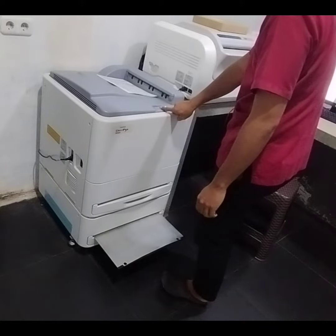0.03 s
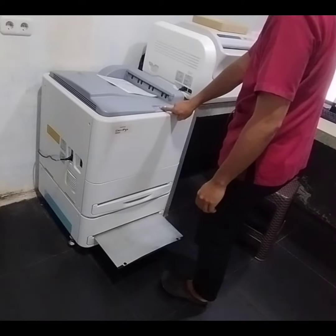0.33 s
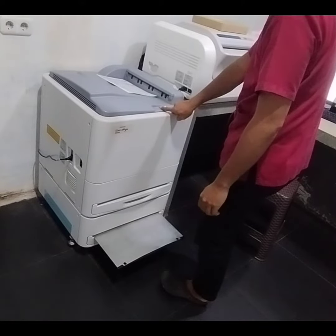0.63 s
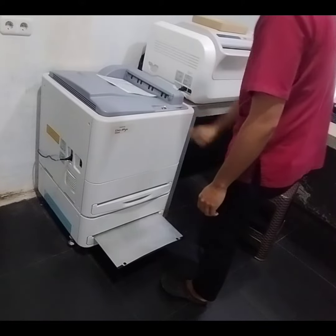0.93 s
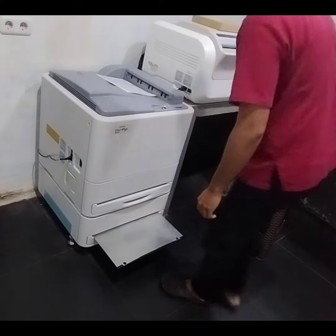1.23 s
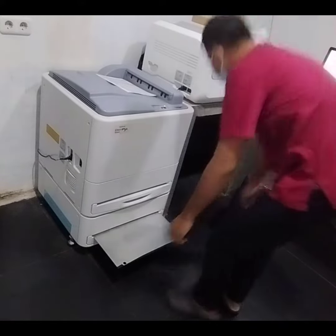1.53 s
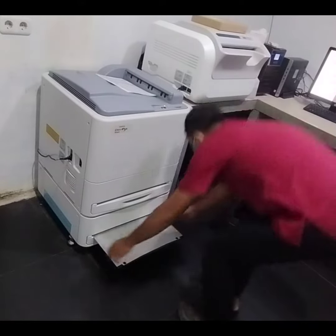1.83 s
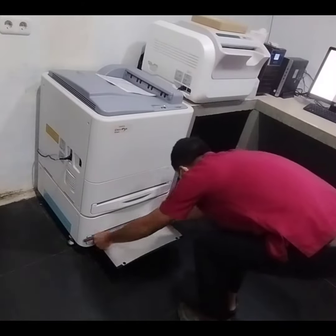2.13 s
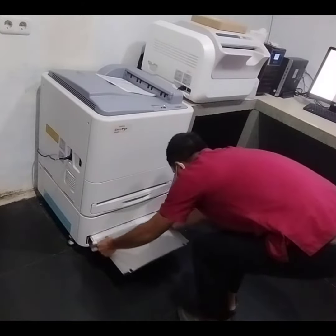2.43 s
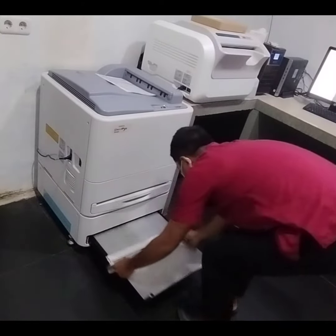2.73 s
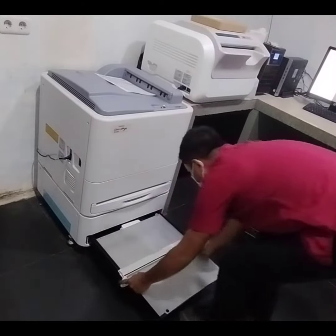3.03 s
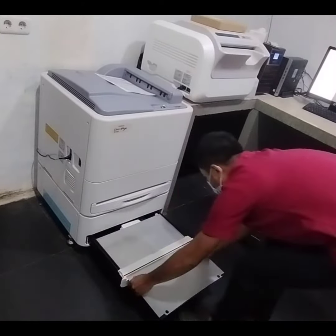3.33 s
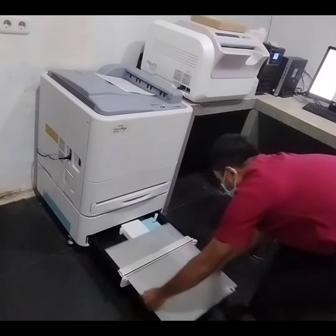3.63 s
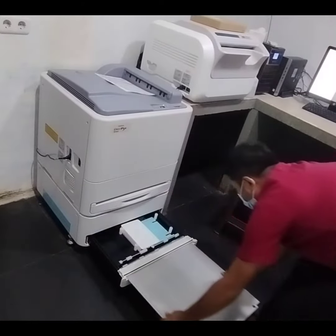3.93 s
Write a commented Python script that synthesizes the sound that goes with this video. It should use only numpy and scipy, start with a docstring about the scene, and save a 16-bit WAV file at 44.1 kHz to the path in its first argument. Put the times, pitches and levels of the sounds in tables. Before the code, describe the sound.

A plastic machine tray clacks open and rattles along its rails in a small room.

```python
"""Opening a film printer's tray.

A film printer's fans hum in a small tiled room. A button on its lid clacks; someone bends down with
rustling clothes, twists a creaky latch and draws out the plastic film tray. It knocks, clinks and
rattles along its steel rails, then scrapes with a low stick-slip groan. A phone hears it all from
two metres, mostly by way of the walls."""
import sys
import numpy as np
from scipy import signal
from scipy.fft import rfft, irfft
from scipy.io import wavfile

SR = 44100
rng = np.random.default_rng(int(sys.argv[2]) if len(sys.argv) > 2 else 0)


def file_out(sig):
    """Save sig as 16-bit WAV at sys.argv[1]."""
    # one column per channel
    cols = np.atleast_2d(sig).T
    # limit, then scale
    lim = np.clip(cols, -1, 1)
    pcm = np.round(lim * 32767).astype(np.int16)
    wavfile.write(sys.argv[1], SR, pcm)


N = 176400
T = np.arange(N) / SR
HZ = np.arange(N + 1) * SR / (2 * N)


def amp(db):
    return 10 ** (np.asarray(db) / 20)


def unit_rms(x):
    return x / np.sqrt(np.mean(x ** 2))


def unit_energy(x):
    return unit_rms(x) / np.sqrt(N)


def curve(rows, column=1):
    """One column of a table, joined over time."""
    rows = np.array(rows)
    return np.interp(T, rows[:, 0], rows[:, column])


def per_hz(points, hz):
    """Points joined on a log-frequency axis."""
    points = np.array(points)
    return np.interp(np.log(hz + 1), np.log(points[:, 0]), points[:, 1])


def response(colour):
    """Minimum-phase impulse response of an EQ curve."""
    cepstrum = irfft(np.log(amp(per_hz(colour, HZ))))
    cepstrum[1:N] *= 2
    cepstrum[N + 1:] = 0
    return unit_energy(irfft(np.exp(rfft(cepstrum)))[:N])


def convolve(x, h):
    return irfft(rfft(x, 2 * N) * rfft(h, 2 * N))[..., :N]


def drift(rate_hz):
    """Smooth random motion with a spread of 1."""
    return unit_rms(irfft(rfft(rng.standard_normal(2 * N)) / (1 + (HZ / rate_hz) ** 4))[:N])


def diffuse(alike_hz=556):
    """Stereo spectrum of noise from all sides: left and right agree only in the bass."""
    alike = 1 / (1 + (HZ / alike_hz) ** 2)
    mid, side = rfft(rng.standard_normal((2, 2 * N)))
    return mid * np.sqrt(1 + alike) + np.array([[1], [-1]]) * side * np.sqrt(1 - alike)


def grains(per_s, spread_db):
    """Dense tiny clicks of very unequal size."""
    size = amp(spread_db * np.minimum(rng.exponential(size=N), 4))
    return unit_rms((rng.random(N) < per_s / SR) * size * rng.standard_normal(N))


def mode(hz, t60, age=T):
    """One resonance ringing out."""
    return np.sin(2 * np.pi * hz * age) * np.exp(-np.log(1000) * age / t60)


# reverb time of the tiled room (frequency [Hz], t60 [s])
ROOM_DECAY = [(100, 0.77), (400, 0.75), (3000, 0.78), (8000, 0.77), (14000, 0.37)]


def room(build_s=0.00067):
    """Stereo tail of the hard walls, shorter in the top octave."""
    noise, tail = diffuse(), 0
    edges = np.r_[0, np.geomspace(150, SR / 2, 10)]
    for lo, hi in zip(edges, edges[1:]):
        band = irfft(noise * (HZ >= lo) * (HZ < hi))[:, :N]
        tail = tail + band * np.exp(-np.log(1000) * T / per_hz(ROOM_DECAY, (lo + hi) / 2))
    return unit_energy(tail * (1 - np.exp(-T / build_s)))


def in_room(x, walls, direct_db=-8):
    """Reverb with the weaker direct sound mixed in."""
    return convolve(x, walls) + amp(direct_db) * x


def plastic_shell(colour, modes, ring_db):
    """Response of struck plastic: a broad crack and a few ringing modes."""
    ring = sum(amp(db) * mode(hz, t60) for hz, db, t60 in modes)
    return unit_energy(response(colour) + amp(ring_db) * unit_energy(ring))


def whiten(push):
    """Keep a hit's timing but spread its energy evenly over all frequencies."""
    spectrum = rfft(push, 4 * len(push))
    flat = irfft(spectrum / abs(spectrum))[:len(push)]
    return flat / np.linalg.norm(flat)


def blows(hits, shell, thud_hz=742, tick_hz=6440):
    """Each hit is a push and a brief chatter in three bands; hits alternate between two room tails."""
    # (edges [Hz], filter, chatter decay [s], chatter over push [dB], direct sound [dB])
    bands = [(thud_hz, "low", 0.014, 10.5, -4.5),
             ([thud_hz, tick_hz], "band", 0.0061, 10.5, -8),
             (tick_hz, "high", 0.0061, 41, -5.5)]
    spots, out = [room(), room()], 0
    noise = rng.standard_normal((len(hits), SR // 4))
    t = T[:noise.shape[1]]
    for k, (edges, kind, chatter_s, chatter_db, direct_db) in enumerate(bands):
        force = np.zeros((2, N))
        for i, (at, *band_db) in enumerate(hits):
            chatter = noise[i] * np.exp(-t / chatter_s)
            push = (t == 0) + amp(chatter_db) * chatter / np.linalg.norm(chatter)
            start = int(at * SR)
            force[i % 2, start:start + len(t)] += amp(band_db[k]) * whiten(push)
        crossover = signal.butter(4, edges, kind, fs=SR, output="sos")
        struck = convolve(force, unit_energy(signal.sosfilt(crossover, shell)))
        out = out + sum(in_room(x, walls, direct_db) for x, walls in zip(struck, spots))
    return out


# dark wash of fan air (frequency [Hz], gain [dB])
AIR_COLOUR = [(20, -5.5), (45, -20), (86, -7), (144, -5.5), (267, -15), (399, -11), (780, -21),
              (1400, -29.5), (5000, -40), (8000, -52), (15500, -57.5)]
# motor hum (frequency [Hz], level [dB])
MOTOR_TONES = [(48.4, -53), (100.5, -48.5), (147, -50), (296, -58), (786, -59), (812.9, -61), (1087, -62),
               (2094, -70), (3262, -68), (5010, -76)]


def fans():
    """The bed: cooling fans push steady air over slightly wavering motor tones."""
    air = unit_rms(convolve(irfft(diffuse())[:, :N], response(AIR_COLOUR)))
    air *= amp(-41.5 + .5 * drift(13))
    hum = sum(amp(db + 1.5 * drift(5.6)) * np.sin(2 * np.pi * hz * T + 0.8 * drift(3.5))
              for hz, db in MOTOR_TONES)
    return air + hum


# button press and release (time [s], thud [dB], clack [dB], tick [dB])
BUTTON_HITS = [(.398, -11, -12, -23), (.4036, -5.5, -1.5, -8), (.4111, 3.5, -16.5, -33),
               (.8451, -15, -17, -19)]
# crack of the lid (frequency [Hz], gain [dB])
LID_COLOUR = [(45, -27), (129, -4.5), (266, -3), (413, 1), (740, -12), (1350, -9.5), (3270, -14.5),
              (8470, -38), (15500, -27.5)]
# ring of the lid (frequency [Hz], gain [dB], t60 [s])
LID_RING = [(250, 4, 0.25), (385, 6, 0.2), (953, -10, .6), (1303, -1, 0.33), (1707, -11, .6),
            (2245, -8, .55), (2600, -2, 0.27), (3290, -6, .65)]


def button():
    """The button strikes the plastic lid: a firm clack down, a softer one back up."""
    return blows(BUTTON_HITS, plastic_shell(LID_COLOUR, LID_RING, ring_db=-6))


# swishes of clothing (time [s], half width [s], level [dB])
SWISHES = [(.815, 0.041, -51.5), (1.36, 0.065, -48.5), (1.61, 0.11, -54), (1.711, 0.056, -47.5),
           (2.1, 0.28, -53), (3.075, 0.053, -40)]
# airy tone of the fabric (frequency [Hz], gain [dB])
CLOTH_COLOUR = [(300, -28), (1200, 1.5), (3500, -2.5), (6000, -3), (8500, -9.5), (11000, -7), (13000, -5.5),
                (15500, 0)]


def clothes(walls):
    """Fabric rubs in soft, grainy swells as the person turns and crouches."""
    swell = sum(amp(db) * np.exp(-((T - at) / width) ** 2) for at, width, db in SWISHES)
    friction = swell * grains(per_s=9000, spread_db=4)
    return in_room(convolve(friction, response(CLOTH_COLOUR)), walls)


# rattle of the tray running on its rails (time [s], level [dB])
RATTLE_LEVEL = [(2.2, -42.5), (2.33, -43.5), (2.49, -35.5), (2.62, -43.5), (2.78, -37), (2.88, -40.5),
                (2.96, -28.5), (3.05, -45), (3.22, -40.5), (3.4, -53.5)]


def rattle(tray, walls):
    """The rails shake the tray with small, uneven clicks."""
    force = grains(per_s=2000, spread_db=2.5) * amp(curve(RATTLE_LEVEL) + 1.6 * drift(29))
    moving = T > RATTLE_LEVEL[0][0]
    return in_room(convolve(force * moving, tray), walls)


# fingers twisting the latch (time [s], level [dB])
CREAK_LEVEL = [(2.25, -43), (2.28, -49), (2.32, -48), (2.345, -41), (2.46, -47)]
# squeaky resonances of the latch (frequency [Hz], width [Hz], gain [dB])
LATCH_PEAKS = [(1100, 210, 2.5), (1640, 750, 4), (3080, 1000, -6), (5140, 4200, -13)]


def latch_creak(walls):
    """The plastic latch rubs in its seat: quick slips ring a few resonances."""
    ring = sum(amp(db) * unit_energy(np.sin(2 * np.pi * hz * T) * np.exp(-np.pi * width * T))
               for hz, width, db in LATCH_PEAKS)
    twisting = (T > CREAK_LEVEL[0][0]) & (T < CREAK_LEVEL[-1][0])
    slips = grains(per_s=3900, spread_db=4.5) * amp(curve(CREAK_LEVEL)) * twisting
    return in_room(convolve(slips, unit_energy(ring)), walls, direct_db=-5.5)


# squeak of the grip on the latch (starting frequency [Hz], level [dB])
SQUEAK_PARTIALS = [(1680, -50), (2080, -41), (3120, -48)]


def finger_squeak(walls, start_s=2.25, length_s=0.055, sag_per_s=3.4, jitter=.011):
    """A fingertip sticks on smooth plastic: a few unsteady, falling partials."""
    age = np.clip(T - start_s, 0, length_s)
    swell = np.sin(np.pi * np.sqrt(age / length_s))
    clock = np.cumsum(1 - sag_per_s * age + jitter * drift(220)) / SR
    tone = sum(amp(db) * np.sin(2 * np.pi * hz * clock) for hz, db in SQUEAK_PARTIALS)
    return in_room(swell * tone, walls, direct_db=-4.5)


# the heavy tray bumping the cabinet (time [s], level [dB])
CABINET_HITS = [(2.313, -28.5), (2.507, -24), (2.528, -35), (2.914, -27)]


def cabinet_bumps(walls, hz=83.6, t60=0.21):
    """Low thumps: the tray's weight sets off the cabinet's lowest mode."""
    thumps = sum(amp(db) * mode(hz, t60, np.maximum(T - at, 0)) for at, db in CABINET_HITS)
    return thumps + amp(-7) * convolve(thumps, walls)


# knocks of latch and tray (time [s], thud [dB], clack [dB], tick [dB])
TRAY_HITS = [(2.3156, -28, -14, -16), (2.340, 2.5, -10.5, -38), (2.468, 0, -6, -36), (2.5085, 4, 1, -18),
             (2.5226, 9, 3, -1.5), (2.55, 2.5, -23, -18), (2.8294, -9, -3, -7.5), (2.9047, 2, 1.5, -9.5),
             (2.943, 4, -4, -13.5), (3.1003, -4.5, -13, -16), (3.157, -12, -11.5, -16)]
# hollow crack of the tray (frequency [Hz], gain [dB])
TRAY_COLOUR = [(40, -34), (125, 3), (220, -8.5), (350, -4.5), (470, -7), (640, -13), (1000, -15.5),
               (2400, -18), (3300, -21), (6000, -28), (8300, -36.5), (15500, -31)]
# ring of the tray (frequency [Hz], gain [dB], t60 [s])
TRAY_RING = [(128.3, 12, 1), (460.5, 7, 0.27), (560, -1, 0.22)]


def tray_shell():
    """The tray's boomy plastic body, shared by its knocks and its rattle."""
    return plastic_shell(TRAY_COLOUR, TRAY_RING, ring_db=-10)


def tray_knocks(tray):
    """The latch lets go and the tray knocks its way along the rails."""
    return blows(TRAY_HITS, tray)


# the catch and the stops striking the rail (time [s], bite centre [Hz], level [dB])
RAIL_HITS = [(2.5225, 1630, -5), (2.904, 2180, -5.5), (2.947, 2540, -12)]
# ring of the steel rail (frequency [Hz], gain [dB])
RAIL_RING = [(1420, -8), (1685, 0), (2498, -5), (3747, 1), (4317, 12.5)]


def rail_clinks(walls, bite_s=0.0067, width_octaves=.2, t60=.3, ring_db=-4):
    """Steel on steel: a hard bite, then the rail rings, favouring the modes near the bite's pitch."""
    out = 0
    for at, centre_hz, db in RAIL_HITS:
        age = np.maximum(T - at, 0)
        near = lambda hz: 1 / (1 + (np.log2((hz + 1) / centre_hz) / width_octaves) ** 2)
        band = irfft(rfft(rng.standard_normal(2 * N)) * near(HZ) ** 2)[:N]
        bite = band * np.exp(-age / bite_s) * (T > at)
        ring = sum(near(hz) * amp(gain) * mode(hz, t60, age) for hz, gain in RAIL_RING)
        out = out + amp(db) * (unit_energy(bite) + amp(ring_db) * unit_energy(ring))
    return in_room(out, walls, direct_db=-3.5)


# grit of the last pull (time [s], level [dB])
GRIT_LEVEL = [(3.42, -53), (3.56, -36.5), (3.66, -32.5), (3.76, -35), (3.86, -33), (4, -33)]
# tone of the grit (frequency [Hz], gain [dB])
GRIT_COLOUR = [(120, -25), (200, -8), (350, -2), (480, -8.5), (560, -3), (702, -6), (923, -11),
               (5910, -18.5), (8350, -27), (12900, -18.5), (15500, -19.5)]
# pitch of the groan (time [s], slip rate [Hz])
GROAN_PITCH = [(3.63, 115.5), (3.72, 120.5), (3.76, 118), (3.8, 120), (3.83, 117), (3.87, 120), (4, 118.5)]
# layers of the groan (time [s], fundamental [dB], octave [dB], buzz [dB])
GROAN_LEVELS = [(3.53, -44, -61, -68), (3.6, -27.5, -38, -39), (3.65, -25, -32, -34.5),
                (3.71, -25, -34, -38.5), (3.77, -36, -27.5, -40.5), (3.82, -25, -31.5, -33),
                (3.91, -22.5, -47, -33.5), (3.97, -21.5, -27.5, -36)]
# overtones that make the buzz (harmonic number, gain [dB])
BUZZ_HARMONICS = [(3, 7.5), (4, 7.5), (5, -1.5), (6, 3), (7, -0.5)]


def tray_scrape(walls, jitter=0.007, slip_depth=.35, low_cut_hz=140):
    """The tray sticks and slips: a groan, with grit bunched at each slip."""
    phase = 2 * np.pi * np.cumsum(curve(GROAN_PITCH) * (1 + jitter * drift(21.5))) / SR
    groaning = T > GROAN_LEVELS[0][0]
    low_gain, octave_gain, buzz_gain = (amp(curve(GROAN_LEVELS, k)) * groaning for k in (1, 2, 3))
    buzz = unit_rms(sum(amp(db + 2.2 * drift(13)) * np.sin(k * phase + .25 * drift(16))
                        for k, db in BUZZ_HARMONICS))
    upper = octave_gain * np.sin(2 * phase) + buzz_gain * buzz
    width = amp(-1.5) * convolve(upper, walls - walls.mean(axis=0))  # reflections widen the overtones
    groan = low_gain * np.sin(phase) + upper + width
    grit = grains(per_s=14000, spread_db=4.5) * (1 + slip_depth * np.cos(phase))
    grit *= amp(curve(GRIT_LEVEL) + 1.5 * drift(22)) * (T > GRIT_LEVEL[0][0])
    grit = signal.sosfilt(signal.butter(2, low_cut_hz, "high", fs=SR, output="sos"), grit)
    return groan + in_room(convolve(grit, response(GRIT_COLOUR)), walls, direct_db=-9)


def scene():
    """Button, latch, tray and clothing over the bed of the fans."""
    walls, tray = room(), tray_shell()
    press = button()
    pull = latch_creak(walls) + tray_knocks(tray) + cabinet_bumps(walls)
    slide = rattle(tray, walls) + tray_scrape(room())
    return press + pull + slide + clothes(walls) + fans() + finger_squeak(walls) + rail_clinks(walls)


# balance of the phone's two microphone ports (frequency [Hz], left over right [dB])
PORT_BALANCE = [(100, 1.5), (400, -0.5), (3000, 0), (6300, -3.5), (9500, -0.5), (12500, 12.5), (15500, 3.5)]
# treble ripple in both ports (frequency [Hz], gain [dB])
PORT_RIPPLE = [(6000, -1), (7400, -0.5), (8350, -6), (9400, -1), (11000, -8), (13200, 0), (15500, -0.5)]


def record(dry, top_hz=15800):
    """The phone's two ports differ mostly in the treble; the top is cut steeply."""
    ports = amp(np.array([[.5], [-.5]]) * per_hz(PORT_BALANCE, HZ) + per_hz(PORT_RIPPLE, HZ))
    high_cut = 1 / (1 + (HZ / top_hz) ** 300)
    return irfft(rfft(dry, 2 * N) * ports * high_cut)[:, :N]


dry = scene()
out = record(dry)
file_out(out)
```